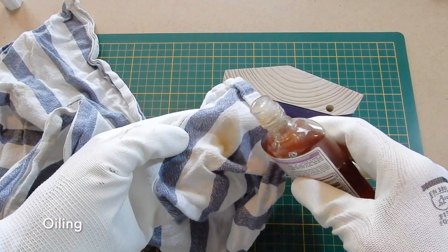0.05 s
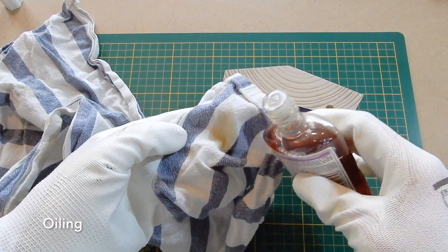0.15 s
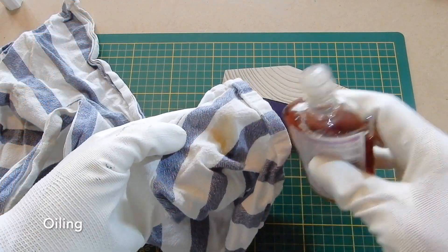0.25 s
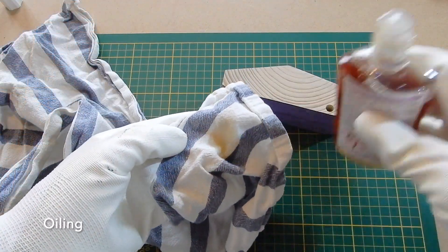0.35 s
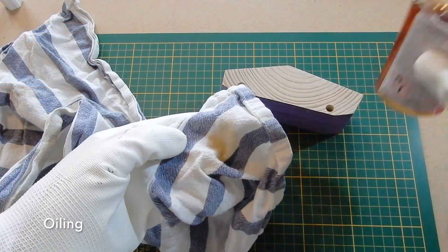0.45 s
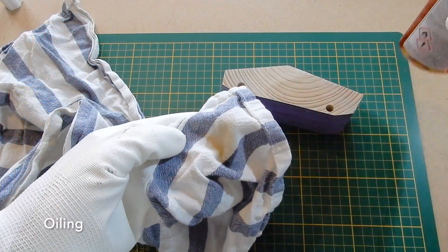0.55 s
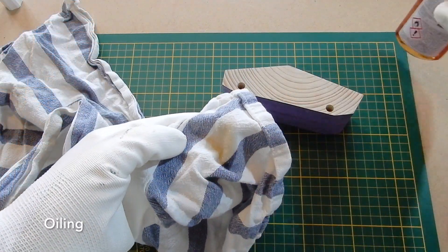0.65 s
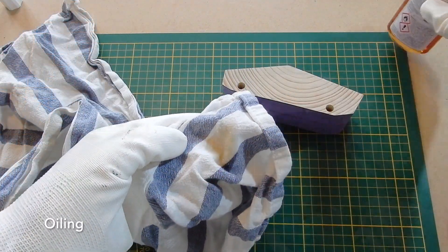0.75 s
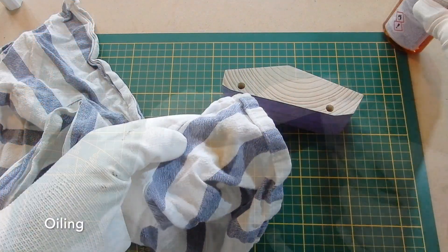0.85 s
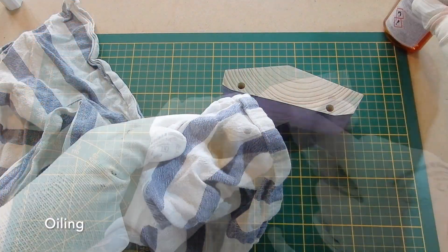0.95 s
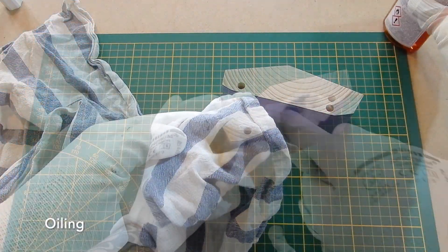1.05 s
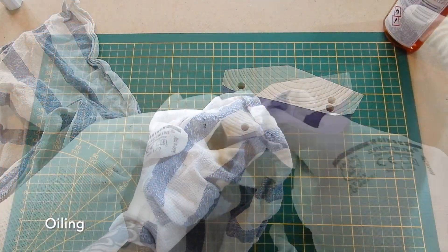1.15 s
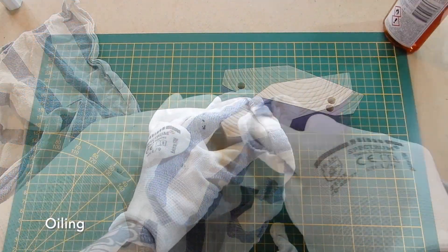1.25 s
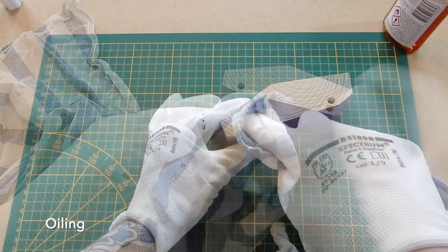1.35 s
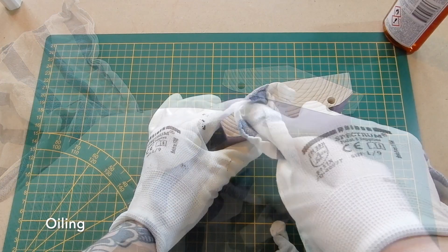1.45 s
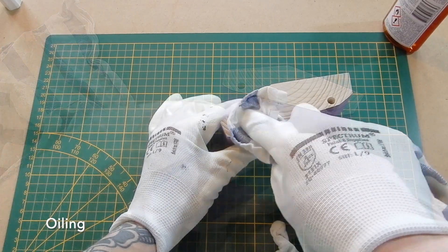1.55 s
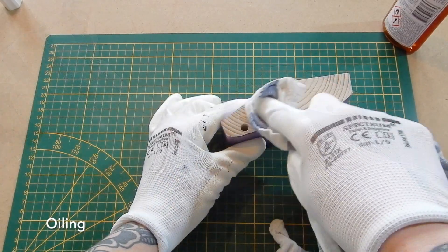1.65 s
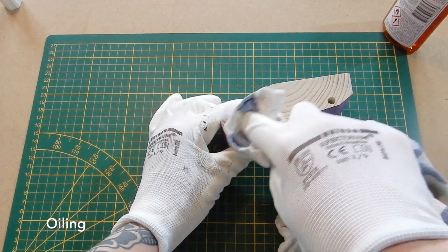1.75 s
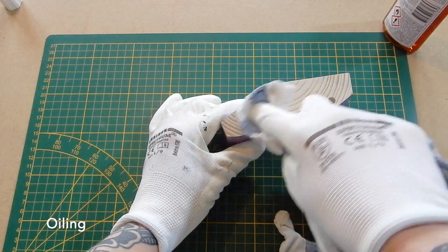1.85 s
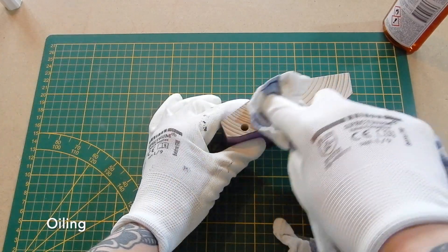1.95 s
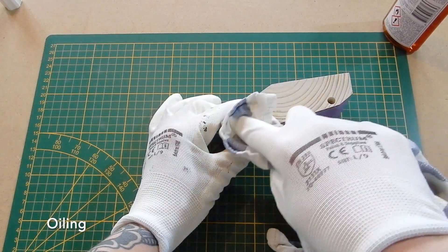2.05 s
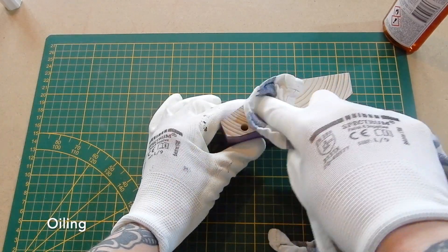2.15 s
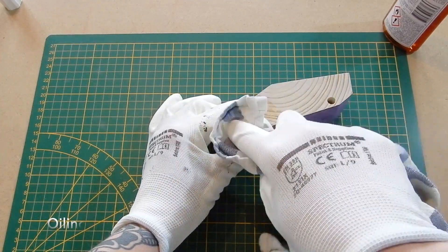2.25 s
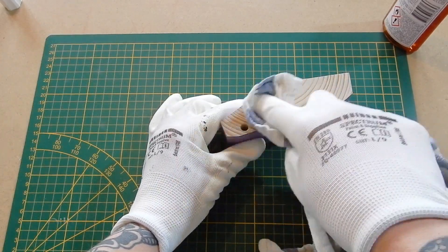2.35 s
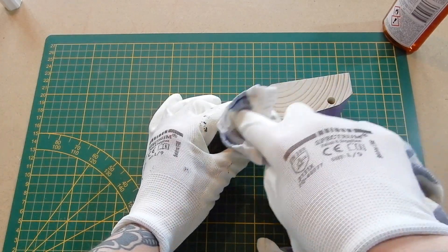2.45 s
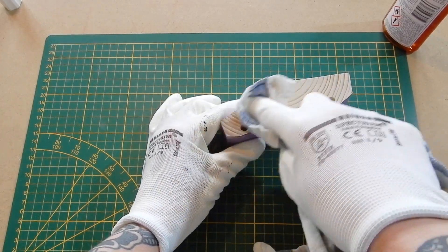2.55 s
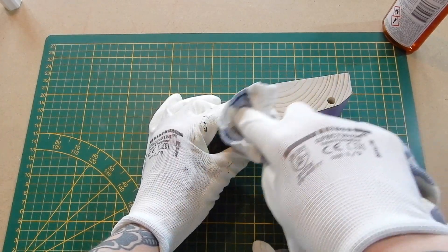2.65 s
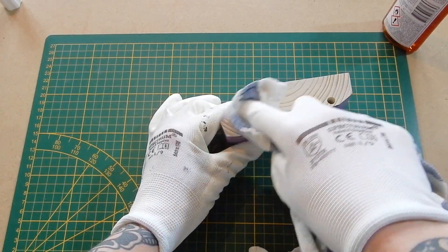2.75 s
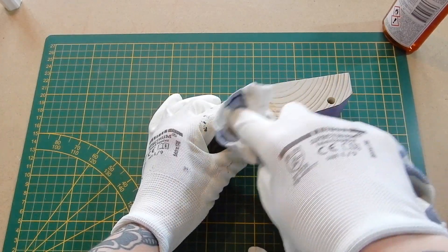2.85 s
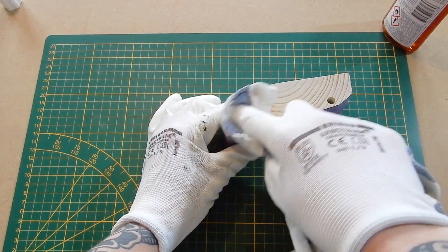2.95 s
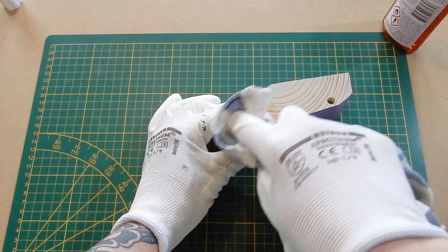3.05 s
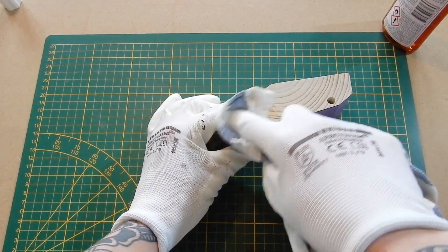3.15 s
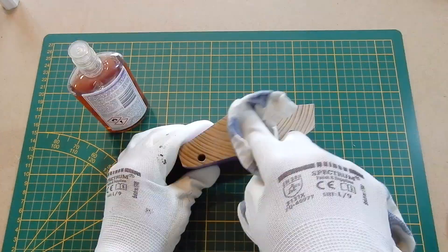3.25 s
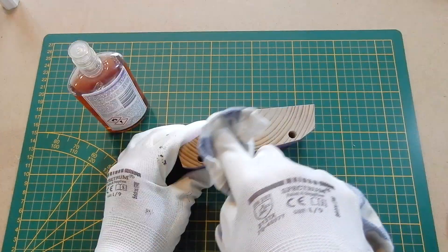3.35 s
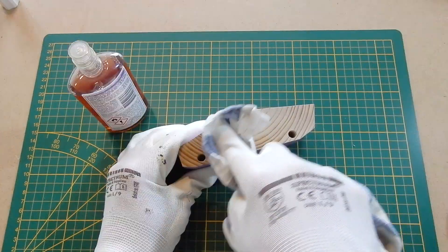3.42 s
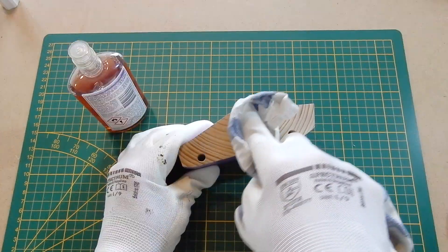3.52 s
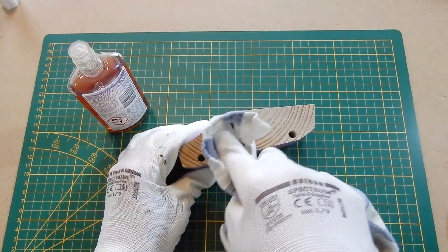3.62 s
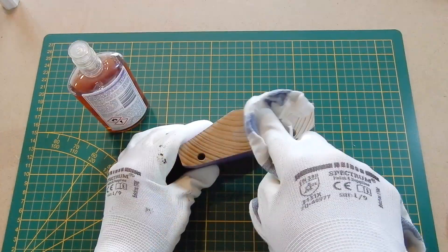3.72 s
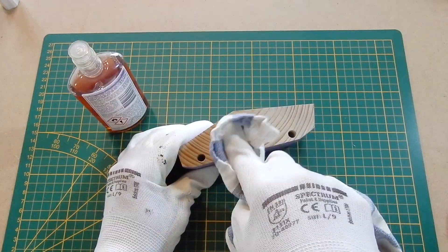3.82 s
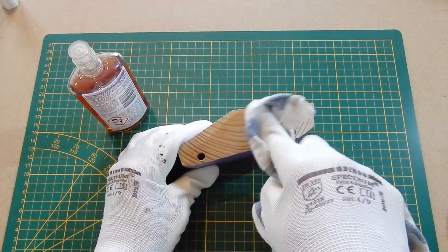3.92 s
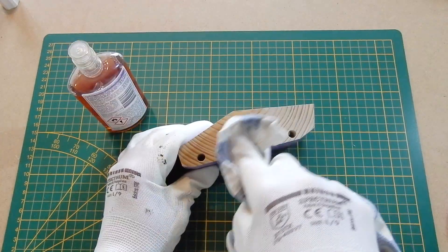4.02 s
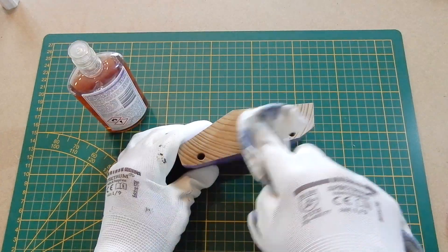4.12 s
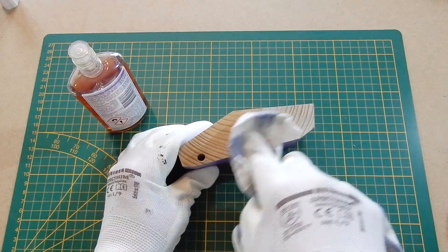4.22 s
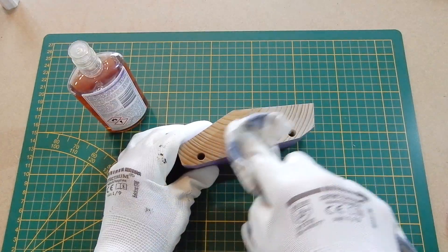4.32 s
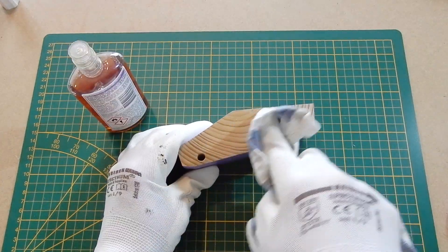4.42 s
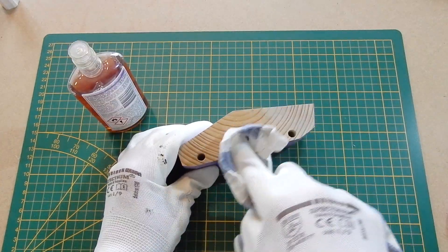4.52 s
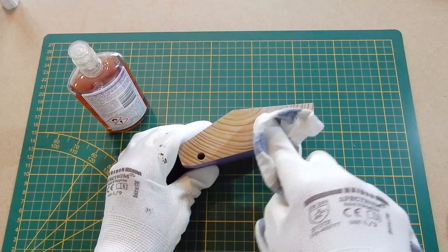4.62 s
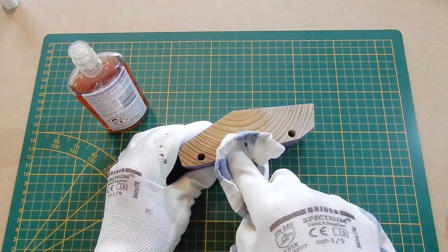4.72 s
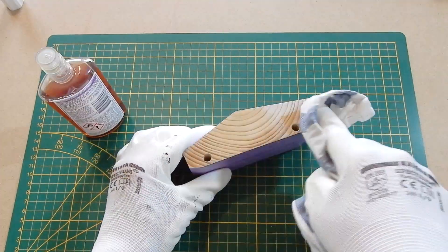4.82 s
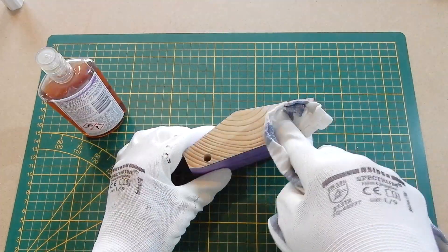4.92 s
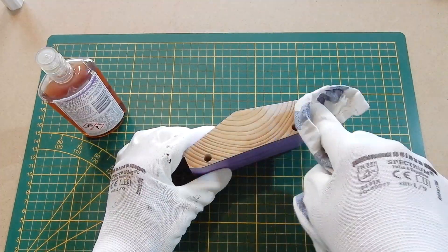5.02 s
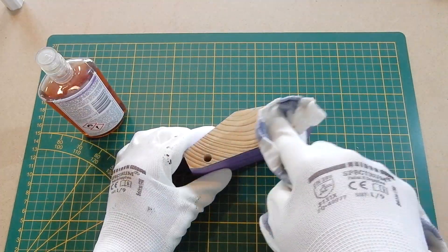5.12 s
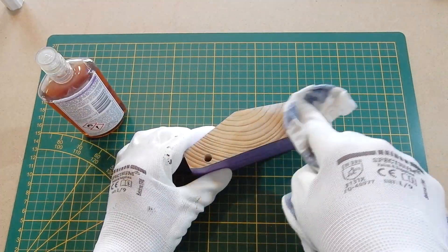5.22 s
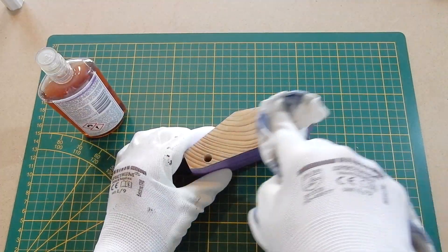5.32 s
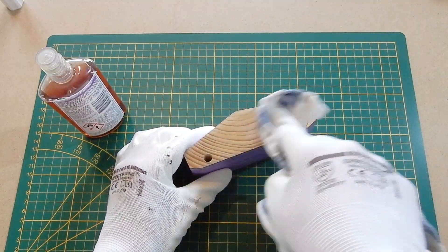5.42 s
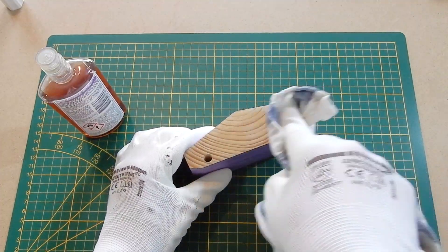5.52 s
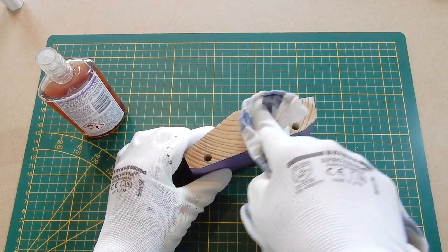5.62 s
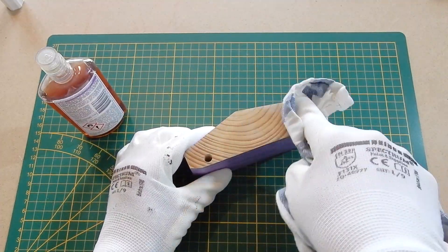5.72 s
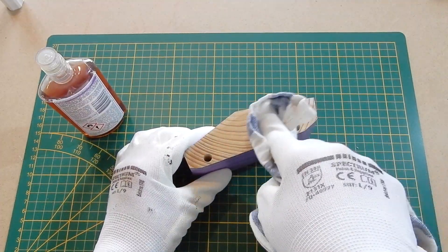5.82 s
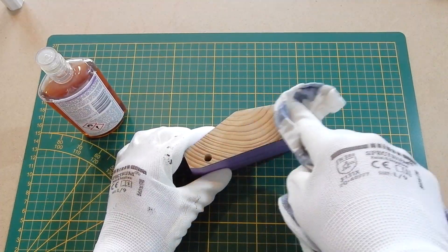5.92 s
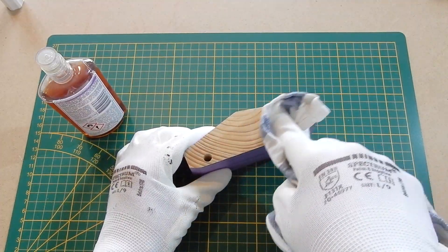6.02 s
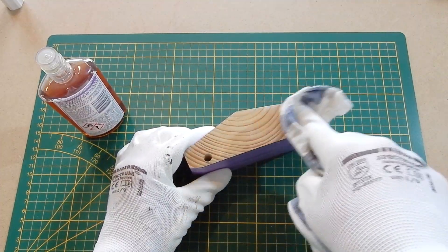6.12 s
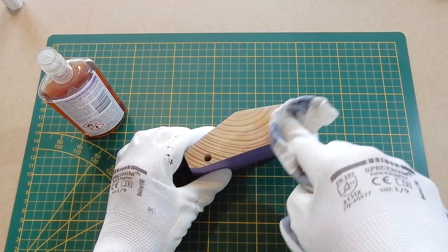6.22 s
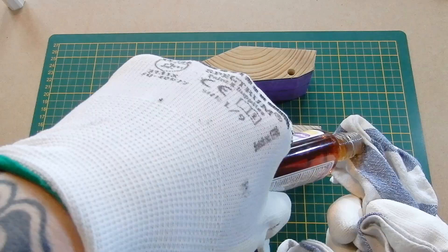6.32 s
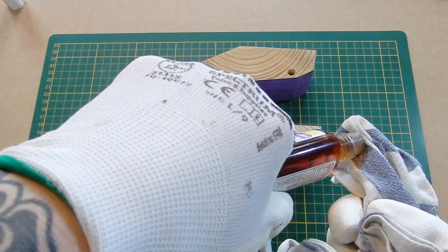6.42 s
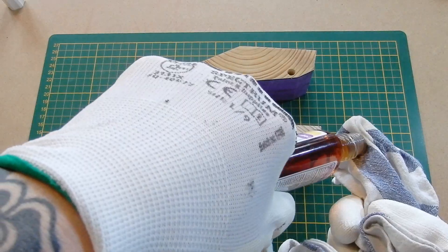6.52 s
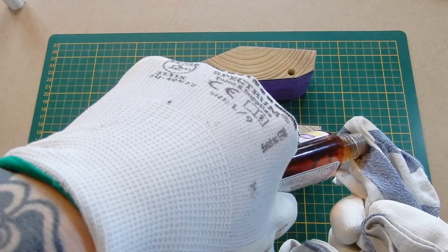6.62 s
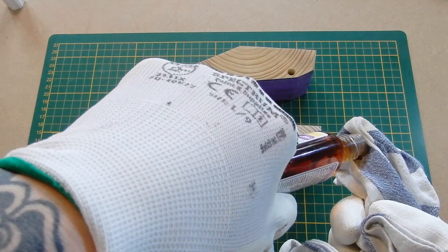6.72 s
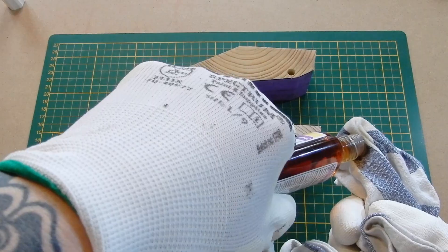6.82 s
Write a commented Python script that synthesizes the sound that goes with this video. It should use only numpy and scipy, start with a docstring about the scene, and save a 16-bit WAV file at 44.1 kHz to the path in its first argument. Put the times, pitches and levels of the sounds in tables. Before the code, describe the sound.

The sound is close, in a small, quiet room. At the start, gloves softly rustle a rag and a little glass bottle scuffs off the cloth. A few dull bumps on the work table come around 0.8 seconds. Near 1 second the bottle lands with one sharp knock, a wooden thump with a short glassy ring.

From about 1.75 seconds the rag scrubs a wooden toy back and forth, roughly nine strokes a second, making a gritty, rhythmic hiss over a low table rumble. The toy now and then rocks with soft thuds. The strokes lighten around 3 seconds, with a dull bump at 3.2, then build and are strongest from about 4.5 to 5.5 seconds, with a few more low thuds just after 5. The rubbing eases off and stops short at about 6.4 seconds, leaving faint room tone.

```python
"""In a small, quiet room, a short, narrow burst opens the sound, and gloves rustle a rag beside a little glass
bottle of oil. The hands bump the work table, and near 1 s the bottle lands with one knock: wood thumps, glass
rings. From 1.75 s the oiled rag scrubs a wooden toy to and fro, nine strokes a second, at three places in turn.
Fibres catch on the grain and hiss, while the pressed toy rocks and makes the table rumble. The rubbing eases
off; at about 6.4 s its hiss and rumble break off abruptly, leaving the room tone."""
import sys
import numpy as np
from scipy import signal
from scipy.fft import rfft, irfft, next_fast_len
from scipy.io import wavfile
from scipy.ndimage import uniform_filter1d

SR = 44100
rng = np.random.default_rng(int(sys.argv[2]) if len(sys.argv) > 2 else 0)


def store_wav(level_fs):
    """Save 16-bit WAV to argv[1]."""
    pcm = np.round(np.clip(np.atleast_2d(level_fs), -1, 1) * 32767)
    wavfile.write(sys.argv[1], SR, pcm.T.astype(np.int16))


N = 303021
SIZE = next_fast_len(N, True)
HZ = np.fft.rfftfreq(SIZE, 1 / SR)
TIME = np.arange(N) / SR

# Levels in the tables are relative; each layer sets its own gain.
# Colour of the room tone. Each row: frequency in Hz, level in dB.
AIR_COLOUR = [(20, -17), (45, -5.5), (90, -3), (150, -1), (220, -1), (450, -8), (600, -9), (850, -13.5),
              (1250, -21.5), (1700, -20.5), (5000, -24.5), (6800, -30.5), (10000, -35.5), (15500, -41)]
# Faint resonances in the room tone. Each row: centre in Hz, width in Hz, boost in dB.
AIR_RESONANCES = [(460, 62, 4), (1054, 120, 10.5), (1406, 103, 11), (1970, 205, 10), (2390, 120, 5),
                  (2804, 94, 10.5), (3620, 260, 6), (4500, 250, 7.5), (6070, 180, 7.5)]
# The room's tail. Each row: frequency in Hz, seconds to fall 60 dB.
ROOM_DECAY = [(80, 0.55), (300, 0.42), (1000, 0.5), (4000, 0.3), (12000, 0.11)]
# Gloves brush the rag. Each row: peak time, rise and fall in seconds, level in dB.
GLOVE_BRUSHES = [(0.005, 0.02, 0.077, -56.5), (0.14, 0.08, 0.14, -58.5), (0.228, 0.036, 0.03, -54),
                 (0.32, 0.04, 0.04, -63.5), (0.575, 0.05, 0.06, -58), (0.77, 0.086, 0.1, -63),
                 (1.25, 0.2, 0.06, -64.5)]
# Dull bumps on the table, from the hands early on and the shifting toy near 3.2 s.
# Each row: time in seconds, level in dB.
SOFT_BUMPS = [(0.713, -47), (0.744, -50.5), (0.806, -46), (0.83, -52), (0.857, -51), (3.206, -40),
              (3.235, -47)]
# Colours of the rag's rustle, the opening burst and a bump. Each row: frequency in Hz, level in dB.
RUSTLE_COLOUR = [(880, -34), (1500, -10), (1680, -28), (1930, -10), (2430, -1.5), (3930, -2), (5350, -2.5),
                 (9720, -11), (15000, -25)]
BURST_COLOUR = [(1700, -22.5), (2200, -13), (2450, -7), (2750, -14), (5000, -39)]
BUMP_COLOUR = [(60, -29), (170, -8), (320, -4.5), (600, -20), (1500, -29.5), (4000, -58)]
# The bottle lands and settles flat. Each row: time in seconds, thud in dB, clink in dB.
BOTTLE_CONTACTS = [(.9420, 0, 3), (0.946, 0, 0.5), (0.949, 2.5, -27), (0.9586, -4, -4), (.9620, -5, -19),
                   (0.9683, -4.5, -8), (0.9724, -2.5, 2.5), (0.9759, -12, -2), (0.9854, -19, -8)]
# Modes of table top and bottle. Each row: frequency in Hz, level in dB, seconds to fall 60 dB.
TABLE_MODES = [(86.5, -12.5, 0.76), (102, -25, .25), (135, 8, 0.15), (159, -18, 0.35), (309.1, -7, 0.33),
               (366, -5, 0.24), (397, -10, 0.27), (451, -8.5, 0.34), (502, -6, 0.18), (548, -14, 0.22),
               (608, -14.5, 0.29), (648, -18, .28), (757, -18, 0.16), (853, -21, 0.2), (950, -21, 0.21),
               (1068, -17.5, 0.17), (1188, -25, 0.19)]
GLASS_MODES = [(2020, -4, .06), (2275, -4, 0.05), (3545, -1, 0.15), (3620, -1, 0.1), (3706, -4, 0.13),
               (4710, -1.5, 0.13), (4800, -7, .08), (5518, -10, .11), (5992, -8.5, 0.09), (7354, -12, .1),
               (8258, -15, .12), (8489, -13.5, 0.11)]
# Colours of the blow on the table and the glass foot's clack. Each row: frequency in Hz, level in dB.
THUD_COLOUR = [(12, -49), (30, -20), (55, -7), (90, 4), (130, 6.5), (200, -2), (330, 0), (600, -14),
               (1100, -22.5), (1500, -39), (4000, -101)]
CLACK_COLOUR = [(700, -26), (1400, -12), (2100, 0.5), (3600, -1), (4500, -3), (8500, -10), (12000, -20),
                (14000, -27), (15500, -40)]
# Colour of the table's rumble. Each row: frequency in Hz, level in dB.
RUMBLE_COLOUR = [(18, -47), (30, -10), (70, -2), (146, 3.5), (188, 0.5), (214, -6), (305, -3), (374, -10),
                 (415, -8), (573, -14.5), (1000, -16.5), (1300, -21), (2200, -120)]
# The toy rocks and thuds on the table. Each row: time in seconds, level in dB.
TOY_ROCKS = [(2.15, -49), (2.375, -48), (2.79, -50), (4.03, -50), (4.255, -62), (5.012, -44.5),
             (5.115, -45.5), (5.222, -43), (6.355, -52.5)]
# Rag strokes, push and pull in turn. Each row: start in seconds, length in seconds, level in dB.
RAG_STROKES = [(1.75, 0.075, -46.5), (1.859, 0.075, -43), (1.975, 0.076, -45.5), (2.096, 0.082, -42.0),
               (2.226, 0.058, -47.5), (2.326, 0.07, -47.5), (2.438, 0.078, -47), (2.552, 0.06, -47.0),
               (2.661, 0.065, -49.5), (2.765, 0.056, -48.5), (2.874, 0.059, -52.5), (2.965, 0.072, -51),
               (3.078, 0.059, -51), (3.163, 0.084, -52.5), (3.274, 0.053, -55.5), (3.354, 0.052, -48.5),
               (3.452, 0.073, -50.5), (3.569, 0.069, -48.5), (3.681, 0.07, -48), (3.797, 0.073, -45.0),
               (3.91, 0.059, -42.5), (4.02, 0.053, -43.0), (4.122, 0.073, -42.5), (4.237, 0.057, -43),
               (4.344, 0.069, -42.5), (4.457, 0.064, -40), (4.566, 0.074, -41), (4.687, 0.06, -41),
               (4.795, 0.07, -43), (4.895, 0.054, -41.5), (4.987, 0.079, -39), (5.105, 0.056, -39.5),
               (5.204, 0.074, -38.5), (5.32, 0.059, -41), (5.428, 0.078, -39), (5.55, 0.063, -42.5),
               (5.662, 0.073, -41), (5.787, 0.075, -43.5), (5.902, 0.077, -43.5), (6.026, 0.05, -43),
               (6.128, 0.061, -47), (6.231, 0.055, -44), (6.321, 0.067, -46)]
# Times in seconds at which the hand moves to the next place on the toy.
PLACE_CHANGES_S = [3.34, 4.875]
# The hand's motion at each place. Each row: arch of the speed, rise and fall in seconds,
# swell over the stroke in dB, drag in dB.
PLACE_MOTIONS = [(0.61, 0.025, .022, 0, -14.5), (0.21, 0.0088, .011, -4.2, -19),
                 (0.53, .009, 0.016, -3.5, -21.5)]
# The grain at each place. Each row, all in dB: coarse rasp, rasp added on a push and taken off a pull,
# fine sheen, wood resonance.
PLACE_GRAINS = [(-0.2, 2.5, -2, 7.5), (5, 1, -0.9, -0.5), (1.3, 0.1, 0.1, -6)]
# Colour of the hiss at each place. Each row: frequency in Hz, level in dB.
NEAR_COLOUR = [(760, -35), (1300, -12.5), (1410, -5), (1620, -12), (1910, -8.5), (2120, -10), (2310, -10.5),
               (3660, -4.5), (4020, -4), (5790, 0.5), (9170, -2.5), (14700, -11.5), (15800, -12)]
MIDDLE_COLOUR = [(760, -36), (1300, -28), (1570, -20), (1850, -15), (2590, -11.5), (3890, -5.5), (4510, -2),
                 (6500, -0.5), (8800, -4.5), (9870, -4), (11300, -7.5), (14800, -10), (15800, -13)]
FAR_COLOUR = [(760, -71), (1300, -20), (1620, -17), (1970, -14), (3360, -10), (4020, -9), (4320, -4.5),
              (5730, -4.5), (8090, -1.5), (9370, -1.5), (11000, -9), (15100, -14.5), (15800, -15)]
# Resonances of the toy. Each row: centre in Hz, width in Hz, relative strength.
WOOD_RESONANCES = [(2390, 340, 1), (3140, 200, 0.15), (4460, 740, 0.57)]
# Stereo image of the hiss. Each row: frequency in Hz, left-right likeness from 0 to 1.
HISS_LIKENESS = [(1000, 0.66), (3000, 1), (7000, 0.99), (10000, 0.93), (14000, 0.53)]


def gain_of(db):
    """Decibels to gain."""
    return 10 ** (np.asarray(db) / 20)


def unit_rms(x):
    """Scales a signal to rms 1."""
    return x / np.sqrt(np.mean(x ** 2) + 1e-20)


def curve(points, hz):
    """Joins a table's points on a log-frequency axis."""
    freqs, values = np.transpose(points)
    return np.interp(np.log(hz + 1), np.log(freqs + 1), values)


def peaks_db(peaks, hz):
    """EQ curve of a few bells, in dB."""
    return sum(db / (1 + (2 * (hz - centre) / width) ** 2) for centre, width, db in peaks)


def add(mix, first, sound):
    """Mixes a sound in from a given sample on."""
    part = mix[..., first:first + sound.shape[-1]]
    part += sound[..., :part.shape[-1]]


def touch(peak_s, rise_s, fall_s, db):
    """Envelope of one touch: it grows to a peak and dies away."""
    return gain_of(db) * np.exp(-np.maximum((TIME - peak_s) / fall_s, (peak_s - TIME) / rise_s))


def noise(colour_db, likeness, size=SIZE, grit_db=0.):
    """Coloured stereo noise of rms 1; grit roughens it with tiny snaps, 8 samples each."""
    snaps = np.repeat(np.minimum(rng.exponential(1, size // 8 + 1), 5), 8)[:size]
    mid, side = rfft(rng.standard_normal((2, size)) * gain_of(grit_db * snaps)) * gain_of(colour_db)
    mid, side = mid * np.sqrt((1 + likeness) / 2), side * np.sqrt((1 - likeness) / 2)
    return unit_rms(irfft(np.array([mid + side, mid - side]), size)[:, :N])


def wander(rate_hz):
    """Random modulation of rms 1, rolling off above rate_hz."""
    spectrum = rfft(rng.standard_normal(SIZE)) * np.exp(-(HZ / rate_hz) ** 2)
    return unit_rms(irfft(spectrum, SIZE)[:N])


def impulse(colour):
    """The sharpest causal transient of a given colour, energy 1."""
    log_gain = np.log(gain_of(curve(colour, abs(np.fft.fftfreq(8192, 1 / SR)))))
    pulse = np.fft.ifft(np.exp(np.conj(signal.hilbert(log_gain)))).real[:4096]
    return pulse / np.linalg.norm(pulse)


def ring(modes, scatter=0):
    """Dying sines of a struck object, their phases scattered by up to `scatter` cycles."""
    t = TIME[:SR]
    return sum(gain_of(db - 60 * t / t60) * np.sin(2 * np.pi * (hz * t + scatter * rng.random()))
               for hz, db, t60 in modes)


def bass_to_right(x, corner_hz=656.0, leak=0.1):
    """The table's bass reaches the left side weaker and earlier in phase."""
    left, right = x * np.ones((2, 1))
    thin = signal.lfilter(*signal.butter(1, corner_hz, "high", fs=SR), left)
    return np.array([thin + leak * (left - thin), right])


def reverb(x, predelay_s, taps_per_s=3000):
    """Sparse room reflections of random sign, each band dying at its own speed."""
    size = SR // 2
    taps = rng.choice([-1., 1.], (2, size)) * (rng.random((2, size)) < taps_per_s / SR)
    hz, t, bands = signal.stft(taps * (TIME[:size] > predelay_s), SR, nperseg=256)
    decay = gain_of(-60 * t / curve(ROOM_DECAY, hz)[:, None])
    tail = signal.istft(bands * decay, SR, nperseg=256)[1]
    return signal.oaconvolve(x[None], tail / np.linalg.norm(tail[0]), axes=1)[:, :N]


def room_tone(level_db=-59.0):
    """A steady bed of room noise with a few faint resonances."""
    colour_db = curve(AIR_COLOUR, HZ) + peaks_db(AIR_RESONANCES, HZ)
    return gain_of(level_db) * noise(colour_db, likeness=0.39)


def glove_rustle(trim_db=1.0, crinkle_db=1.1, stir_db=-73.5):
    """Gloves brush the rag in soft, crinkly swells."""
    stir = gain_of(stir_db) * (TIME < RAG_STROKES[0][0])  # the held rag is never quite still
    brushes = np.sqrt(stir ** 2 + sum(touch(*row) ** 2 for row in GLOVE_BRUSHES))
    cloth = noise(curve(RUSTLE_COLOUR, HZ), likeness=0.84, grit_db=2.0)
    return cloth * brushes * gain_of(trim_db + crinkle_db * wander(90))


def opening_burst(level_db=-51.5, fall_s=0.048):
    """A short, narrow burst near 2.4 kHz opens the sound and dies away quickly."""
    return gain_of(level_db) * noise(curve(BURST_COLOUR, HZ), likeness=0.97) * np.exp(-TIME / fall_s)


def soft_bumps(trim_db=-4.5, rise_s=0.0028, fall_s=0.03):
    """Dull bumps on the table, from the hands early on and the shifting toy near 3.2 s."""
    dull = bass_to_right(noise(curve(BUMP_COLOUR, HZ), likeness=0.63))
    return gain_of(trim_db) * dull * sum(touch(s, rise_s, fall_s, db) for s, db in SOFT_BUMPS)


def table_thump(thud_db=-0.5, ring_db=-30.0, room_db=-10.0):
    """Each contact of the bottle thuds into the room and sets the table top ringing."""
    times, levels_db, _ = np.transpose(BOTTLE_CONTACTS)
    blows = np.zeros(N)
    blows[(times * SR).astype(int)] = -gain_of(levels_db)
    # the soft work top rounds off every blow and radiates no deep bass
    blows = signal.sosfilt(signal.butter(2, [60, 1800], "band", fs=SR, output="sos"), blows)
    thud = signal.oaconvolve(blows, gain_of(thud_db) * impulse(THUD_COLOUR))[:N]
    body = signal.oaconvolve(blows, gain_of(ring_db) * ring(TABLE_MODES))[:N]
    return bass_to_right(thud + body + gain_of(room_db) * reverb(thud, predelay_s=0.017))


def glass_clink(ring_db=-51.0, clack_db=-23.0, grind_s=0.0024):
    """At each contact the bottle's foot grinds briefly, clacking and ringing the glass."""
    ringing, grinding = np.zeros((2, N))
    t = TIME[:SR // 50]
    swell = 1 - np.exp(-TIME[:SR] / grind_s)  # the ring builds while the foot grinds
    for start, _, db in BOTTLE_CONTACTS:
        grit = rng.standard_normal(len(t)) * np.exp(-t / grind_s)
        add(grinding, int(start * SR), gain_of(db) * grit / np.linalg.norm(grit))
        add(ringing, int(start * SR), gain_of(ring_db + db) * swell * ring(GLASS_MODES, scatter=1))
    return ringing + signal.oaconvolve(grinding, gain_of(clack_db) * impulse(CLACK_COLOUR))[:N]


def bottle_knock():
    """The bottle's quick contacts fuse into one knock: wood below, glass and its reflections on top."""
    glass = glass_clink()
    return table_thump() + glass + reverb(glass, predelay_s=0.0033)


def hand_pressure(press_s=1.56, settle_s=0.42, ease_s=5.35, ease_db_per_s=4,
                  stop_s=6.38, stop_fade_s=0.027):
    """The rubbing hand's weight, 0 to 1: it settles, holds and eases off, then the sound stops short."""
    settle = 1 - np.exp(-np.maximum(TIME - press_s, 0) / settle_s)
    ease = gain_of(-ease_db_per_s * np.maximum(TIME - ease_s, 0))
    return settle * ease * np.exp(-np.maximum(TIME - stop_s, 0) / stop_fade_s)


def table_rumble(shudder_db=-53.5, jolt_db=2.0, lumps_db=1.8, rock_rise_s=0.0074, rock_fall_s=0.022):
    """The toy shudders against the table, most as each stroke takes hold, and thuds when it rocks."""
    starts = np.zeros(N)
    starts[(np.array(RAG_STROKES)[:, 0] * SR).astype(int)] = 1
    jolts = signal.oaconvolve(starts, signal.windows.hann(2400))[:N]
    shudder = unit_rms(gain_of(jolt_db * jolts + lumps_db * wander(43)))
    rocks = sum(touch(s, rock_rise_s, rock_fall_s, db) for s, db in TOY_ROCKS)
    force = np.hypot(gain_of(shudder_db) * shudder * hand_pressure(), rocks)
    rumble = noise(curve(RUMBLE_COLOUR, HZ), likeness=0.43)
    return bass_to_right(rumble, corner_hz=360.0, leak=0.061) * force


def stroke_colour(hz, db, direction, colour, grain, usual_db=-44.5, fold_db=1.7,
                  rasp_hz=3700.0, sheen_hz=9200.0):
    """EQ of one stroke in dB: light strokes and pushes are coarser than firm strokes and pulls."""
    rasp_db, push_db, sheen_db, wood_db = grain
    lightness_db = usual_db - db  # a light stroke skims the grain: more rasp, more sheen
    rasp_db = rasp_db + 0.76 * lightness_db + push_db * direction
    sheen_db = sheen_db + 0.33 * lightness_db
    low_shelf = 1 / (1 + (hz / rasp_hz) ** 8)
    high_shelf = 1 - 1 / (1 + (hz / sheen_hz) ** 16)
    colour_db = curve(colour, hz) + rasp_db * low_shelf + sheen_db * high_shelf
    # a coarse stroke draws out the wood's resonances
    colour_db += wood_db * np.tanh(max(rasp_db, 0) / 3) * peaks_db(WOOD_RESONANCES, hz)
    # the folds give every stroke a ripple of its own
    colour_db += fold_db * unit_rms(uniform_filter1d(rng.standard_normal(len(hz)), size=56))
    # the toy radiates poorly between the table's rumble and its own resonances
    return colour_db + peaks_db([(1480.0, 700.0, -9.0)], hz)


def rag_stroke(row, direction, colour, motion, grain, drag_s=0.054, snatch_db_per_s=80.0, usual_s=0.08):
    """The rag breaks loose, speeds through an arch and sticks again, its folds dragging on softly."""
    start, length, db = row
    arch, rise_s, fall_s, swell_db, drag_db = motion
    size, middle = 8192, start + length / 2
    first = int(middle * SR - size / 2)
    t, hz = (first + np.arange(size)) / SR, np.fft.rfftfreq(size, 1 / SR)
    colour_db = stroke_colour(hz, db, direction, colour, grain)
    power = gain_of(2 * colour_db)
    body_share = power[(hz > 4000) & (hz < 9500)].sum() / power.sum()  # this band carries the level
    hiss = noise(colour_db, curve(HISS_LIKENESS, hz), size, grit_db=0.93) / np.sqrt(body_share)
    progress = np.clip((t - start) / length, 0, 1)
    attack = np.clip((t - start) / rise_s + .5, 0, 1)
    release = np.clip((start + length - t) / fall_s + .5, 0, 1)
    arc = np.exp(arch * (np.sin(np.pi * progress) - 2 / np.pi))
    # a short stroke is snatched: it spends more of its speed at the start
    swell_db -= snatch_db_per_s * (usual_s - length)
    speed = attack * release * arc * gain_of(swell_db * (progress - .5))
    drag = gain_of(drag_db) * np.exp(-((t - middle) / drag_s) ** 4 / 2)
    return first, hiss * gain_of(db) * np.hypot(speed, drag)


def rag_hiss(trim_db=-0.68, flutter_db=1.12, room_db=-8.0, room_width=0.27):
    """Fibres snap over the grain in gritty strokes; near reflections reach both sides much alike."""
    places = list(zip([NEAR_COLOUR, MIDDLE_COLOUR, FAR_COLOUR], PLACE_MOTIONS, PLACE_GRAINS))
    hiss = np.zeros((2, N))
    for k, row in enumerate(RAG_STROKES):
        place = places[np.searchsorted(PLACE_CHANGES_S, row[0])]
        direction = (-1) ** k  # +1 pushes, -1 pulls
        add(hiss, *rag_stroke(row, direction, *place))
    hiss *= gain_of(trim_db + flutter_db * wander(150))
    echo = reverb(hiss.mean(0), predelay_s=0.005)
    echo = echo.mean(0) + room_width * (echo - echo.mean(0))
    gate = np.interp(TIME, [6.395, 6.412], [1, 0])  # the hiss stops short after the last stroke
    return gate * (hiss + gain_of(room_db) * echo)


def table_shoves(level_db=-50.0, spread_db=2, mode_hz=81.6, rise_s=0.012):
    """From about 4 s on, each pull leans softly into the table's lowest mode."""
    starts = np.array(RAG_STROKES)[21::2, 0]
    shoves, t = np.zeros(N), TIME[:SR // 4]
    shoves[(starts * SR).astype(int)] = gain_of(level_db + spread_db * rng.standard_normal(len(starts)))
    sway = t / rise_s * np.exp(1 - t / rise_s) * np.sin(2 * np.pi * mode_hz * t)
    return bass_to_right(signal.oaconvolve(shoves, sway)[:N])


def scene():
    """The scrubbing, the handling and the bottle's knock over the room tone."""
    scrubbing = rag_hiss() + table_rumble() + table_shoves()
    handling = glove_rustle() + opening_burst() + soft_bumps()
    return scrubbing + handling + bottle_knock() + room_tone()


def record(dry, cutoff_hz=15900):
    """A steep low-pass takes off the very top."""
    low_pass = signal.firwin(511, cutoff_hz, window=("kaiser", 9), fs=SR)
    return signal.oaconvolve(dry, low_pass[None], "same")


dry = scene()
out = record(dry)
store_wav(out)
```